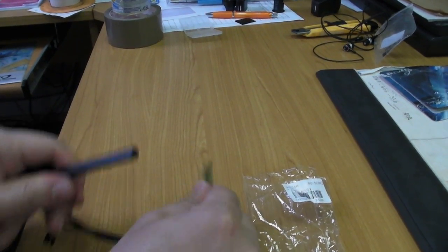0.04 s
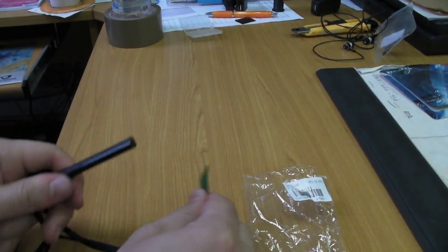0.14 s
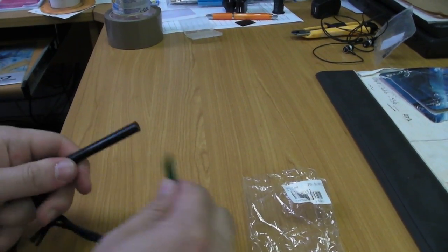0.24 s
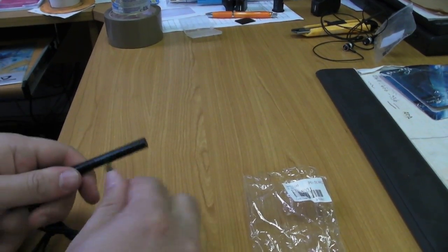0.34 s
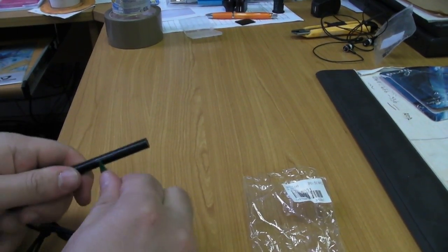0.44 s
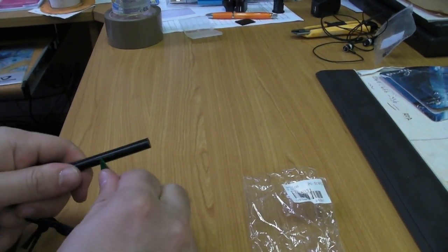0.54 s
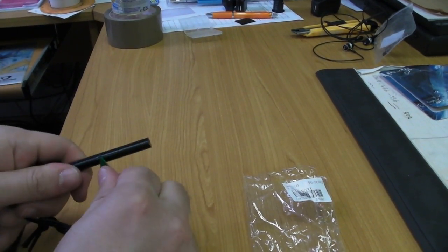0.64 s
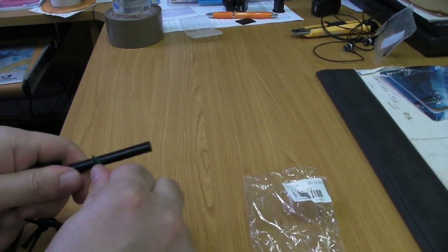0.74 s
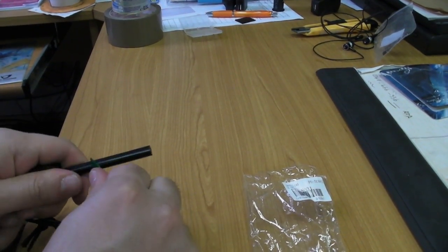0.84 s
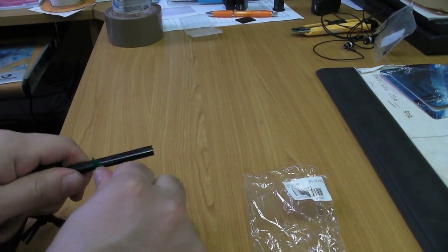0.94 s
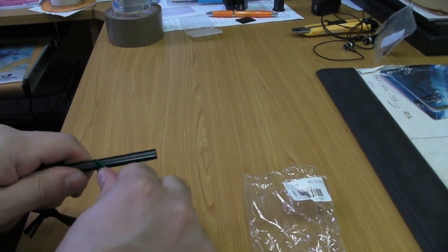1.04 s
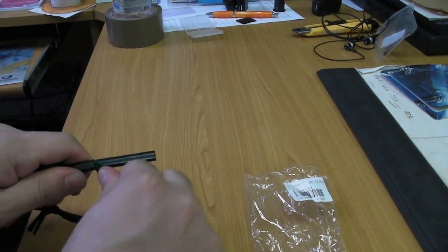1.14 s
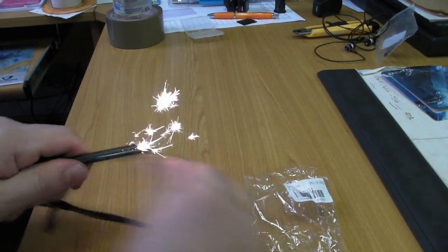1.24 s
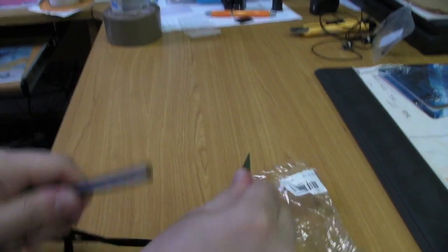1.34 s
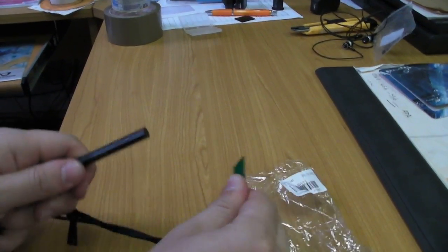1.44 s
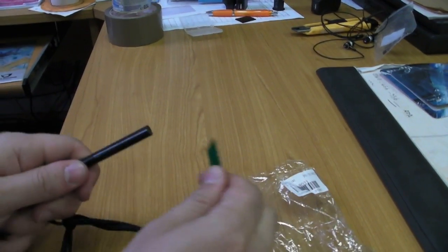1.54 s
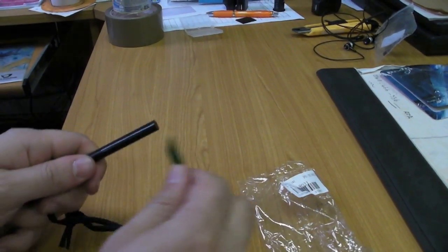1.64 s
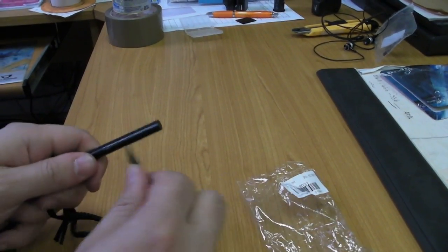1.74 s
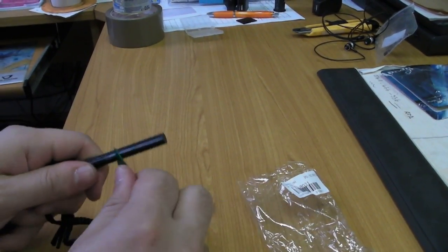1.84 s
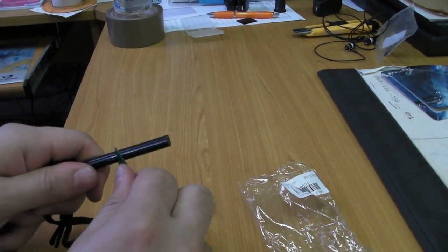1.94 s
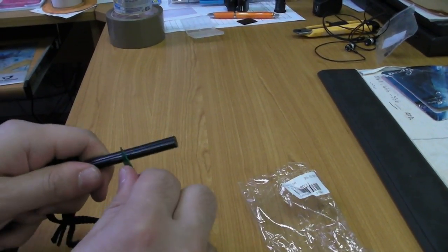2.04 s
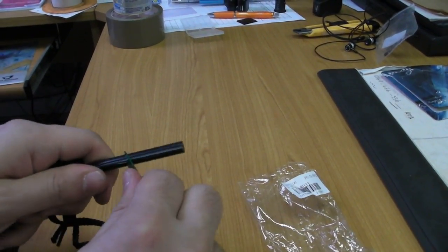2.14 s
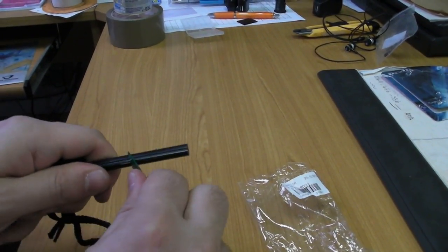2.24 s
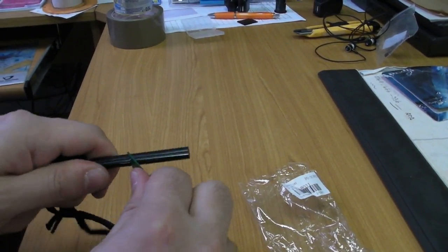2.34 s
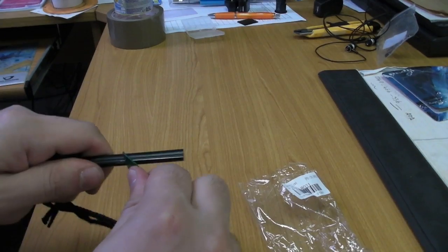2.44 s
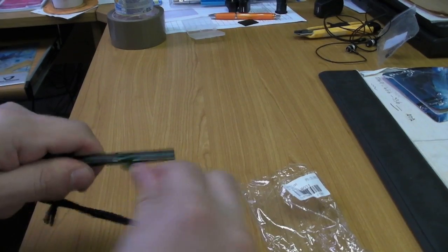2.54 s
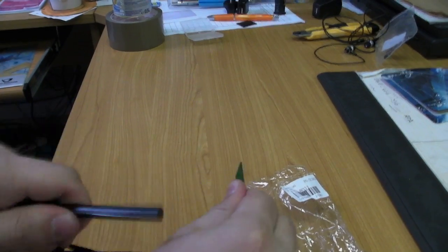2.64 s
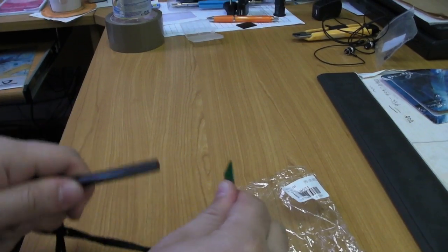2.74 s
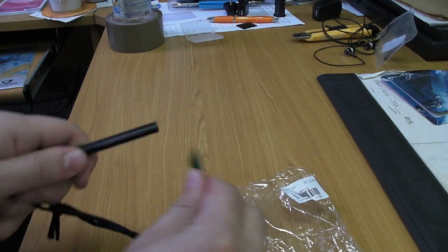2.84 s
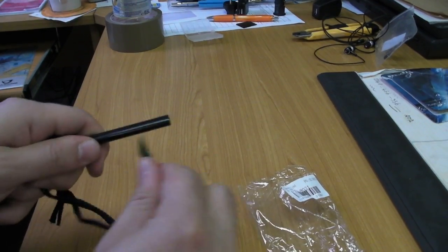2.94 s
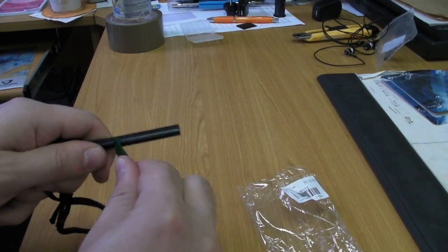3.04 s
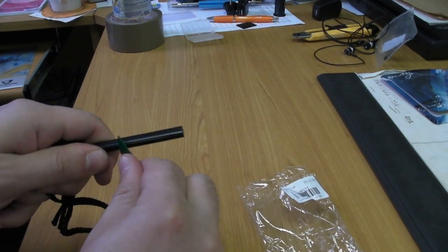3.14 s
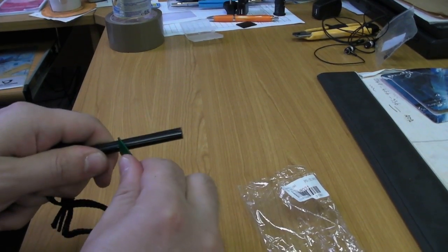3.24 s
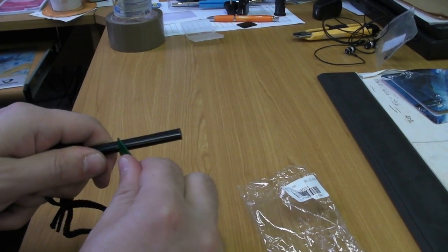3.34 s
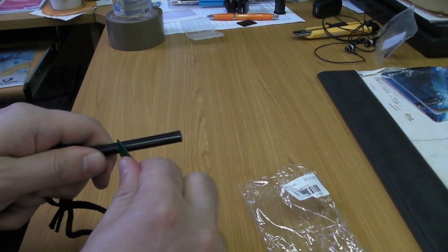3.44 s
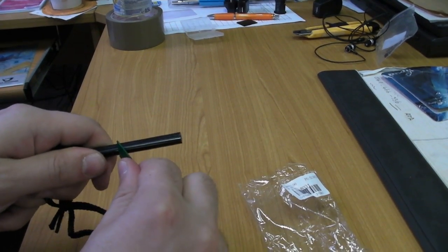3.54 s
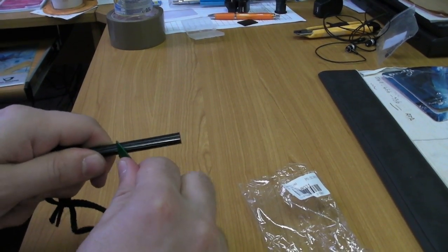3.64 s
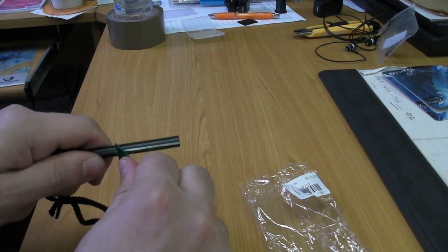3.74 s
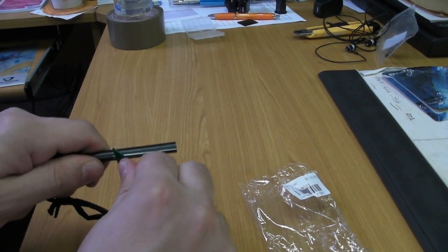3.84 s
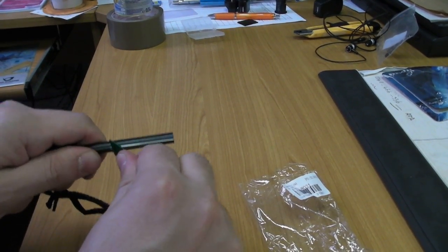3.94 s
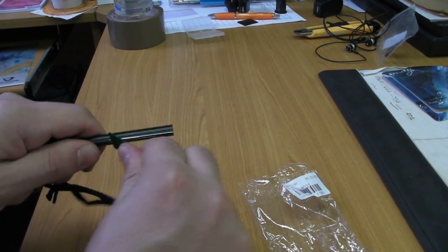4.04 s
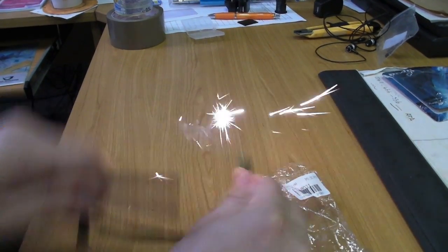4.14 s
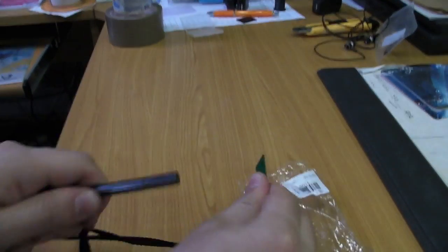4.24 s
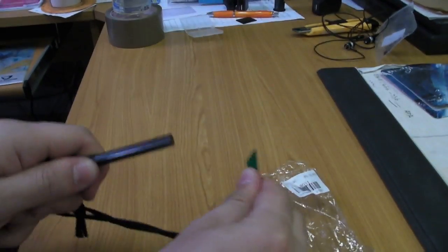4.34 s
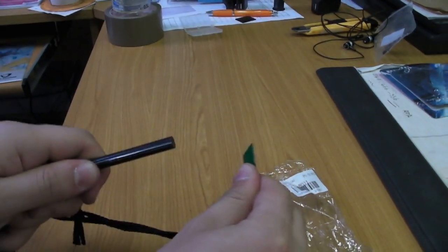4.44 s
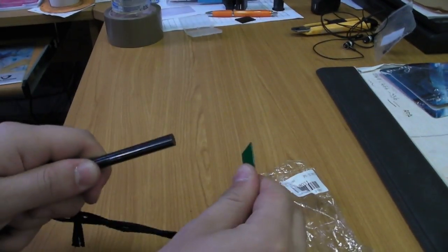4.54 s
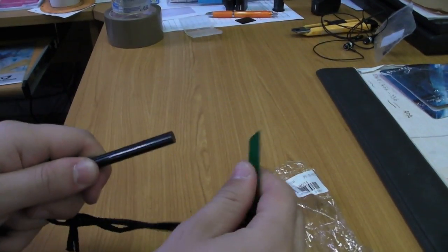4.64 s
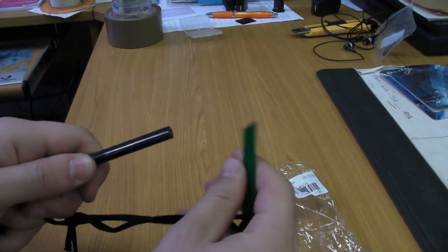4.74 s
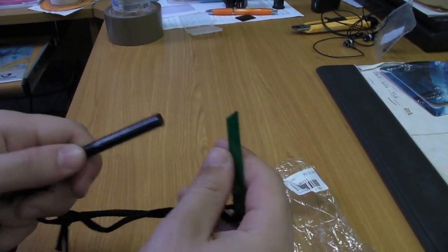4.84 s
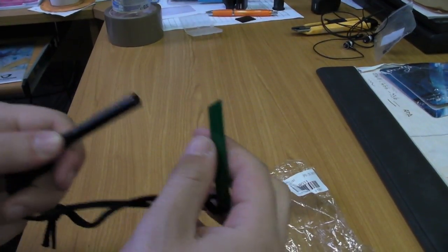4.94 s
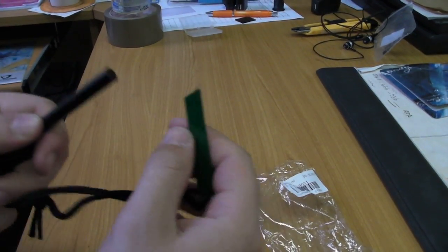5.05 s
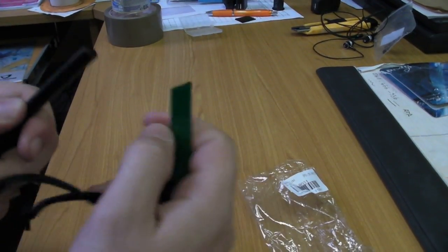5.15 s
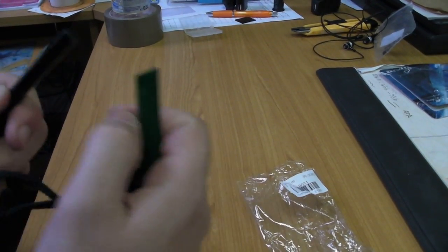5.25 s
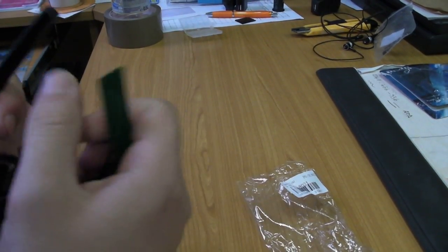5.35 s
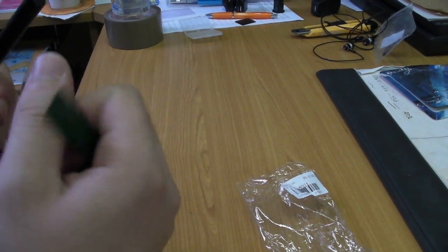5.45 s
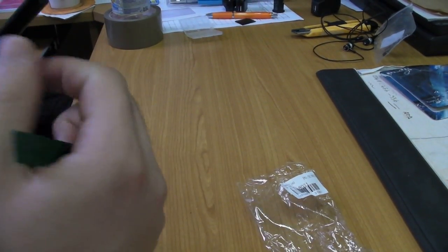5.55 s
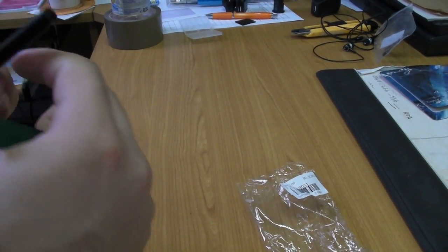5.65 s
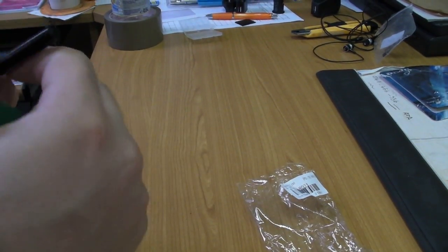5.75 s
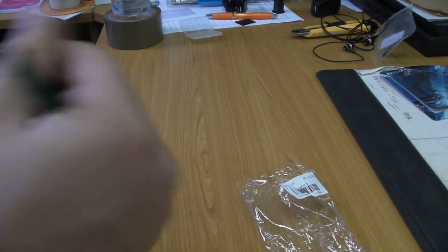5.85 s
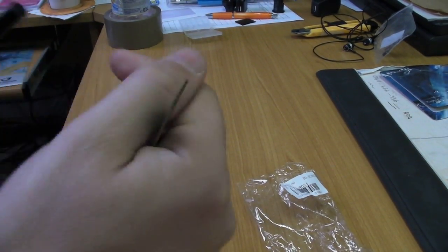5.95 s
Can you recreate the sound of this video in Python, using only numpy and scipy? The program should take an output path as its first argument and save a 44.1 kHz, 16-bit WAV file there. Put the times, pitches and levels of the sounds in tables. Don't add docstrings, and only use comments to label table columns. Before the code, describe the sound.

Close-up at a wooden desk, a steel blade is dragged hard along a fire rod four times, a bit over a second apart. Each very short, bright rasp ends in a sharp snap, a dull hand-and-desk thud and a quick fizz of sparks. Between strokes, small steel ticks and faint creeping scrapes. Quiet small room, soft fan hum, close stereo microphone.

```python
import sys
import numpy as np
from scipy import signal
from scipy.fft import rfft, irfft
from scipy.io import wavfile
from scipy.ndimage import uniform_filter1d

SR = 44100
rng = np.random.default_rng(int(sys.argv[2]) if len(sys.argv) > 2 else 0)


def materialize(psi):
    bounded = np.clip(np.atleast_2d(psi).T, -1, 1)
    quanta = np.round(bounded * 32767).astype(np.int16)
    wavfile.write(sys.argv[1], SR, quanta)


def invert_db(level):
    return 10 ** (np.asarray(level, dtype=float) / 20)


N = 264159

# start_s, hand_db, hand_pitch_ratio, shudder_db, shudder_t60_s
SNAPS = [
    (.101, -32.5, 0.91, -35, .065),
    (1.348, -25, 1.02, -26, 0.13),
    (2.67, -29, 0.95, -33, 0.13),
    (4.213, -25.5, 0.97, -24, 0.11),
]


def unit(x):
    return x / np.sqrt(np.mean(x ** 2))


def smooth_noise(length_s):
    return unit(uniform_filter1d(rng.standard_normal(N), max(int(length_s * SR), 1)))


def resonate(x, modes):
    out = 0
    for k, (hz, width_hz, db) in enumerate(modes):
        b, a = signal.iirpeak(hz, hz / (1.76 * width_hz), fs=SR)
        band = signal.lfilter(b, a, signal.lfilter(b, a, x))
        out = out + (-1) ** k * invert_db(db) * band
    return unit(out)


def colour(x, points):
    hz = np.maximum(np.arange(N // 2 + 1) * SR / N, 1)
    point_hz, point_db = np.transpose(points)
    return irfft(rfft(x) * invert_db(np.interp(np.log(hz), np.log(point_hz), point_db)), N)


def ring(hz, t60_s, push_s):
    t = np.arange(int((t60_s + 4 * push_s) * SR)) / SR
    rise = (1 - np.exp(-t / push_s)) ** 2
    wave = rise * np.exp(-np.log(1000) * t / t60_s) * np.sin(2 * np.pi * hz * t)
    return wave / np.abs(wave).max()


def add(out, start_s, wave):
    i = int(start_s * SR)
    out[i:i + len(wave)] += wave[:N - i]


def thuds(rows, push_cycles):
    out = np.zeros(N)
    for start_s, db, hz, t60_s in rows:
        add(out, start_s, invert_db(db) * ring(hz, t60_s, push_cycles / hz))
    return out


def grit(grain_s, rough_db):
    jumps = smooth_noise(grain_s)
    return rng.standard_normal(N) * invert_db(rough_db * jumps)


def friction(gains, grain_s, rough_db, edge_s):
    # hz, width_hz, level_db
    rod_modes = [(3975, 950, 0.5), (4480, 1590, -1), (5440, 1300, -5.5)]
    rod_ring_modes = [(5200, 590, 0)]
    upper_modes = [(6900, 1350, 0)]
    blade_modes = [(2250, 930, 3), (2980, 690, 9.5), (1700, 1300, -12)]
    chip_modes = [(8160, 1900, -6), (9630, 3500, 14)]
    top_modes = [(14900, 2500, 0)]
    parts = (rod_modes, rod_ring_modes, upper_modes, blade_modes, chip_modes, top_modes)
    gains = uniform_filter1d(gains, max(int(edge_s * SR), 1), axis=1)
    teeth_db = 1.5 * smooth_noise(.0008)
    judder_db = .7 * smooth_noise(.003)
    out = np.zeros(N)
    for modes, gain in zip(parts, gains):
        out += resonate(grit(grain_s, rough_db), modes) * gain
    return invert_db(teeth_db + judder_db) * out


def press(gains, s, db, ring_db, upper_db, blade_db, chips_db, top_db):
    on = np.arange(int(s[0] * SR), min(int(s[-1] * SR), N))
    rod_db = -10 * np.log10(1 + invert_db(ring_db) ** 2)
    parts_db = (rod_db, rod_db + ring_db, upper_db, blade_db, chips_db, chips_db + top_db)
    parts_db = np.broadcast_arrays(s, *parts_db)[1:]
    out = gains.copy()
    out[:, on] += invert_db([np.interp(on / SR, s, db + part_db) for part_db in parts_db])
    return out


def ticks(rows, bright_db, bounce_db, main_t60_s, sides_db):
    # start_s, blade_hz
    grip = [(.1, 2500), (.5, 2720), (1.2, 2920), (1.34, 2570), (2.62, 2450), (3.2, 2480), (4.15, 2250)]
    # hz, t60_s
    side_rings = [(4120, 0.0038), (1700, 0.012)]
    contact_s, crack_s, rise_s, bounce_s = .00027, .00015, .0007, .0008
    detunes = 1 + 0.04 * rng.standard_normal((len(rows), 3))
    t = np.arange(64) / SR
    bright = signal.butter(2, [8500, 15000], "band", fs=SR, output="sos")
    bursts = rng.standard_normal((len(rows), 64)) * t / crack_s * np.exp(-t / crack_s)
    cracks = signal.sosfilt(bright, bursts)
    cracks = cracks / np.abs(cracks).max(axis=1, keepdims=True)
    out = np.zeros(N)
    for (start_s, db, hz, blade_db, upper_db), detune, crack in zip(rows, detunes, cracks):
        blade_hz = np.interp(start_s, *np.transpose(grip))
        touch = np.zeros(1024)
        add(touch, 0, ring(hz, main_t60_s, contact_s))
        add(touch, .0002, invert_db(blade_db + 2.5) * ring(blade_hz, .0036, contact_s))
        add(touch, 0, invert_db(upper_db - 1.5) * ring(7040 * detune[0], .0017, contact_s))
        add(touch, 0, invert_db(bright_db + 5) * crack)
        for (side_hz, t60_s), side_db, ratio in zip(side_rings, sides_db, detune[1:]):
            add(touch, 0, invert_db(side_db) * ring(side_hz * ratio, t60_s, contact_s))
        touch = invert_db(db - 6.5) * touch
        lag_s = np.round(bounce_s * hz) / hz
        add(out, start_s + rise_s, touch)
        add(out, start_s + rise_s + lag_s, invert_db(bounce_db) * touch)
    return out


def air():
    # hz, density_db_per_hz
    hush_spectrum = [(20, -10), (40, -9.5), (110, 2), (170, -1), (300, -6.5), (410, -4.5), (700, -8),
                     (1200, -10), (2500, -10.5), (4200, -13), (5000, -18), (7000, -21), (9000, -23),
                     (15500, -30)]
    # hz, level_db
    side_spectrum = [(60, -4), (110, -9), (200, -8), (380, -6), (700, -4), (1290, -3), (2380, -2.5),
                     (4400, -3.5), (8120, -3.5), (15000, 2)]
    # start_s, level_db
    hush_level = [(0.0, -51.5), (1.23, -51.5), (1.5, -49), (1.93, -51.5), (3.97, -51.5), (4.3, -50),
                  (4.54, -51.5), (5.09, -51.5), (5.46, -51), (5.65, -51.5), (5.99, -51.5)]
    # hz, rms_db
    fan_tones = [(199.2, -68), (516.8, -63), (1034, -75)]
    t = np.arange(N) / SR
    mid = colour(rng.standard_normal(N), hush_spectrum)
    side = colour(colour(rng.standard_normal(N), hush_spectrum), side_spectrum)
    speech_band = signal.butter(4, [200, 4000], "band", fs=SR, output="sos")
    scale = np.std(signal.sosfilt(speech_band, mid))
    hush = np.array([mid + side, mid - side]) / scale * invert_db(np.interp(t, *np.transpose(hush_level)))
    for hz, db in fan_tones:
        drift = np.cumsum(smooth_noise(2000.5 / SR)) * 1.41 / SR
        hush = hush + np.sqrt(2) * invert_db(db) * np.sin(2 * np.pi * (hz * t + drift))
    return hush


def strokes():
    # start_s, pressure_db, speed_0_to_1
    stroke_1 = [(0.054, -41.5, 0.21), (.065, -33, .1), (.068, -30, 0.6), (0.077, -24.5, 0.62),
                (.086, -36, 1), (0.102, -20.5, 0.8), (0.105, -35, 0.56), (.118, -48, .6)]
    stroke_2 = [(1.305, -54, .5), (1.315, -42, .5), (1.318, -29, 0.84), (1.328, -34.5, 0.95),
                (1.346, -23.5, 0.93), (1.356, -24.5, 0.5127), (1.362, -30, 0.438), (1.367, -21.5, 0.62),
                (1.377, -32, .2)]
    stroke_3 = [(2.627, -51, 0.445), (2.64, -37, .45), (2.643, -37, .65), (2.649, -27, 0.99),
                (2.66, -34, 1), (2.672, -21.5, 0.91), (2.674, -38, 0.4), (2.686, -35, .6)]
    stroke_4 = [(4.178, -40, 0.65), (4.188, -27.5, 0.7), (4.205, -28, 0.81), (4.209, -27, 0.7),
                (4.213, -15, 0.48), (4.219, -16, 0.53), (4.227, -30, 0.533), (4.235, -30, 0.79),
                (4.241, -39, 0.72)]
    stroke_blade_db = (-5.5, 2, 1.5, 0)
    stroke_upper_db = (-3, 0.2, 0, -3.5)
    chips_slow_db, chips_fast_db = -11.5, 4.5
    upper_slow_db, upper_fast_db = -15, 3
    gains = np.zeros((6, N))
    for stroke, blade_db, upper_db in zip((stroke_1, stroke_2, stroke_3, stroke_4),
                                          stroke_blade_db, stroke_upper_db):
        s, db, speed = np.transpose(stroke)
        gains = press(gains, s, db, ring_db=-13,
                      upper_db=upper_db + upper_slow_db + (upper_fast_db - upper_slow_db) * speed,
                      blade_db=blade_db - 5 * speed,
                      chips_db=chips_slow_db + (chips_fast_db - chips_slow_db) * speed, top_db=-6.5)
    return friction(gains, grain_s=.0004, rough_db=1.8, edge_s=.001)


def palm():
    # hz, width_hz, level_db
    palm_modes = [(243, 72, 0.5), (365, 130, 2), (507, 160, 10), (670, 620, -4.5)]
    settle_db = (-18.5, -15, -19, -17.5)
    lead_s, rise_s, settle_lag_s, settle_t60_s = 0.0041, 0.0056, 0.03, 0.28
    t = np.arange(SR // 4) / SR
    swell = np.zeros(N)
    for (start_s, *_, db, t60_s), after_db in zip(SNAPS, settle_db):
        for lag_s, wave_db, fade_s in ((-lead_s, db, t60_s), (settle_lag_s, db + after_db, settle_t60_s)):
            shape = np.minimum(t / rise_s, 1) * invert_db(-60 * np.maximum(t - rise_s, 0) / fade_s)
            add(swell, start_s + lag_s, invert_db(wave_db) * shape)
    return swell * resonate(rng.standard_normal(N), palm_modes)


def catches():
    # start_s, peak_db, main_hz, blade_db, upper_db
    catch_rows = [(.0997, 4, 4430, -14, -40), (1.1174, -20.5, 4970, -27, -11),
                  (1.3463, 2, 4460, -10.5, -11), (2.6419, -10.5, 4620, -14.5, 7.5),
                  (2.6569, -10.5, 4020, 5.5, -19), (2.6689, -1, 4370, -10, -5),
                  (4.1554, -25, 4000, -11, -16), (4.1659, -8, 4650, -2.5, -6),
                  (4.1729, -17, 4860, -14, -17), (4.1879, -8.5, 4700, -13, 4), (4.2009, -3, 4000, -12, -23),
                  (4.2133, -5, 4330, -15, -22), (4.2289, -20, 3920, 10, -22), (4.2364, -17, 5200, -10, -8)]
    return ticks(catch_rows, bright_db=-18.5, bounce_db=-13, main_t60_s=.0022, sides_db=(-7, -21))


def hand():
    # hz, level_db, t60_s
    hand_modes = [(243, -7.5, .045), (374, -0.5, 0.044), (594, 8.5, 0.0033), (787, -14.5, 0.035)]
    knuckle_db = (0, -0.5, 6.5, 1)
    rows = []
    for (start_s, db, pitch_ratio, *_), hard_db in zip(SNAPS, knuckle_db):
        for hz, mode_db, t60_s in hand_modes:
            extra_db = hard_db if hz > 450 else 0
            rows.append((start_s, db + mode_db + extra_db, hz * pitch_ratio, t60_s))
    return thuds(rows, push_cycles=.38)


def sparks():
    # start_s, burst_db, burst_t60_s, ember_db, ember_t60_s
    showers = [
        (0.102, -35.5, 0.46, -59, .8),
        (1.377, -36, 0.24, -55.5, 3.3),
        (2.686, -42.5, 0.21, -54.5, 0.86),
        (4.24, -36, 0.22, -56.5, 1.2),
    ]
    shower_blade_db = (-12, -2, -1.5, -2.5)
    shower_chips_db = (-7.5, -6.5, -0.5, -2)
    shower_ring_db = (-.5, -8, -5, -3)
    gains = np.zeros((6, N))
    for shower, blade_db, chips_db, ring_db in zip(showers, shower_blade_db, shower_chips_db, shower_ring_db):
        start_s, burst_db, burst_t60_s, ember_db, ember_t60_s = shower
        for db, t60_s in ((burst_db, burst_t60_s), (ember_db, ember_t60_s)):
            s = np.array([start_s, start_s + t60_s / 2])
            gains = press(gains, s, np.array([db, db - 30]), ring_db, upper_db=-8,
                          blade_db=blade_db, chips_db=chips_db, top_db=-8)
    return friction(gains, grain_s=0.002, rough_db=1.5, edge_s=0.0023)


def desk():
    # start_s, peak_db
    thumps = [
        (.11, -45),
        (1.365, -29.5),
        (2.689, -37),
        (4.237, -31.5),
    ]
    # start_s, peak_db, t60_s
    nudges = [
        (0.131, -43.5, .44),
        (1.37, -24.5, 0.14),
        (1.42, -38, .3),
        (1.47, -42, 0.49),
        (2.681, -30, 0.24),
        (2.698, -34, 0.16),
        (4.213, -34, 0.19),
        (4.254, -33.5, 0.113),
        (4.3, -41, .27),
    ]
    # start_s, peak_db, hz, t60_s
    elbow = (.89, -45, 73.6, .42)
    rows = [(start_s, db, 49.445, 0.13) for start_s, db in thumps]
    rows += [(start_s, db, 111.3, t60_s) for start_s, db, t60_s in nudges]
    return thuds(rows + [elbow], push_cycles=0.17)


def touches():
    # start_s, peak_db, main_hz, blade_db, upper_db
    touch_rows = [(.4943, -7, 5120, -28, -11), (.5249, -3, 5040, -11, -5.5), (.5454, -23, 5100, -20, -12.5),
                  (.6938, -8.5, 4970, -14.5, -7.5), (.814, -19, 4860, -3.5, -33),
                  (.8339, -27, 5200, -7, -19), (.8429, -30, 4957, 3, -20), (.8524, -27, 5070, -19, -22),
                  (1.5623, -26.5, 4650, -21, -27), (1.9729, -22, 5100, -18, -5.5),
                  (1.9774, -25.5, 4540, -19, -20), (2.1296, -23.5, 4800, -29, -22),
                  (2.1715, -27, 5400, -21, -17), (2.1899, -29, 5030, -20, -22),
                  (2.2044, -25.5, 5302, -23, -25), (3.6845, -33, 5030, -16, -24),
                  (5.9464, -26, 4570, -12, -23.5)]
    tap_rows = [(3.1627, -2, 5250, -21, -1.5)]
    laid = ticks(touch_rows, bright_db=-23, bounce_db=-7.5, main_t60_s=.0026, sides_db=(-7, -23.5))
    return laid + ticks(tap_rows, bright_db=-18, bounce_db=-7, main_t60_s=.0026, sides_db=(-24, -30))


def creeping():
    # start_s, length_s, start_db, end_db, blade_db
    creeps = [(0.556, 0.005, -33, -49, -8), (.6895, 0.0053, -39, -38, -9), (0.693, 0.014, -40, -50, -2.5),
              (0.815, 0.033, -53, -44, -2), (1.974, 0.016, -37.5, -55, -12), (2.168, 0.048, -50, -56, -16),
              (3.17, 0.039, -45, -66, -13)]
    # start_s, pressure_db
    slide = [(3.208, -51), (3.226, -48), (3.233, -37.5), (3.243, -46), (3.264, -66)]
    gains = np.zeros((6, N))
    for start_s, length_s, start_db, end_db, blade_db in creeps:
        gains = press(gains, np.array([start_s, start_s + length_s]), np.array([start_db, end_db]),
                      ring_db=1, upper_db=-8.5, blade_db=blade_db, chips_db=-28, top_db=9)
    gains = press(gains, *np.transpose(slide), ring_db=8, upper_db=-2.5, blade_db=-4, chips_db=-23, top_db=-1)
    return friction(gains, grain_s=.0004, rough_db=1.8, edge_s=.001)


def squeaks():
    # start_s, peak_db, pitch_hz
    squeak_rows = [(1.3475, -18.5, 1760), (2.628, -35, 2340), (2.641, -25, 2300), (4.157, -29, 2250),
                   (4.1675, -30, 2250), (4.174, -32, 2250), (4.182, -26, 2250), (4.19, -19.5, 2250),
                   (4.196, -25, 2280), (4.2135, -17.5, 1700), (4.219, -25, 1500), (4.237, -17.5, 2160)]
    return thuds([(start_s, db, hz, 27 / hz) for start_s, db, hz in squeak_rows], push_cycles=0.58)


def pops():
    # start_s, peak_db, main_hz, blade_db, upper_db
    pop_rows = [(1.5409, -28.5, 4200, -8, -6), (2.8589, -29.5, 5150, -6, -3), (4.3919, -37, 5000, -13, 1),
                (4.4593, -30.5, 5200, -8, 0), (5.2525, -25, 4000, -8, 1)]
    return ticks(pop_rows, bright_db=-4, bounce_db=-11, main_t60_s=.0012, sides_db=(-16, -22))


def rustle():
    # start_s, pressure_db
    brush = [(5.87, -62), (5.92, -50), (5.951, -49)]
    gains = press(np.zeros((6, N)), *np.transpose(brush), ring_db=1.5, upper_db=-9, blade_db=-6.5,
                  chips_db=-3, top_db=-5)
    return friction(gains, grain_s=.0004, rough_db=1.8, edge_s=.001)


def room(x):
    t60_s, level_db = 0.33, -28
    t = np.arange(int(t60_s * SR)) / SR
    envelope = np.exp(-np.log(1000) * t / t60_s) * np.clip(t / 0.0055, 0, 1)
    tail = rng.standard_normal((2, len(t))) * envelope
    tail = signal.lfilter(*signal.butter(1, 6000, fs=SR), tail)
    tail = invert_db(level_db) * tail / np.sqrt(np.sum(tail[0] ** 2))
    return signal.fftconvolve(x[None], tail)[:, :N]


def scene():
    steel = strokes() + catches() + sparks() + touches() + creeping() + squeaks() + pops() + rustle()
    body = palm() + hand() + desk()
    treble = signal.sosfilt(signal.butter(2, 8000, "high", fs=SR, output="sos"), steel)
    scatter = rng.standard_normal(240) * np.exp(-np.arange(240) / 60) / np.sqrt(30)
    side = invert_db(-7.5) * np.convolve(treble, scatter)[:N] + invert_db(-21.5) * np.roll(body, 90)
    return steel + body + side * np.array([[1], [-1]]) + room(steel) + air()


def low_pass(x):
    return signal.sosfilt(signal.butter(12, 16110, fs=SR, output="sos"), x)


def record(dry):
    notch_hz, notch_width_hz, notch_share = 7855, 470, 0.98
    dipped = signal.lfilter(*signal.iirnotch(notch_hz, notch_hz / notch_width_hz, fs=SR), dry)
    heard = dry + notch_share * (dipped - dry)
    return low_pass(np.clip(heard, -1, 1))


dry = scene()
out = record(dry)
materialize(out)
```